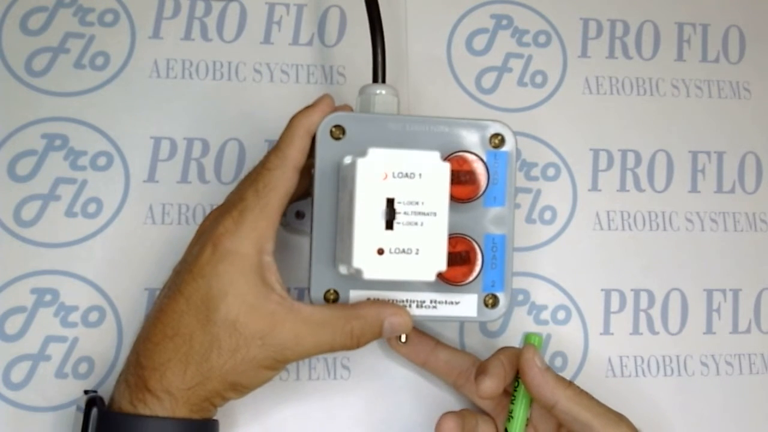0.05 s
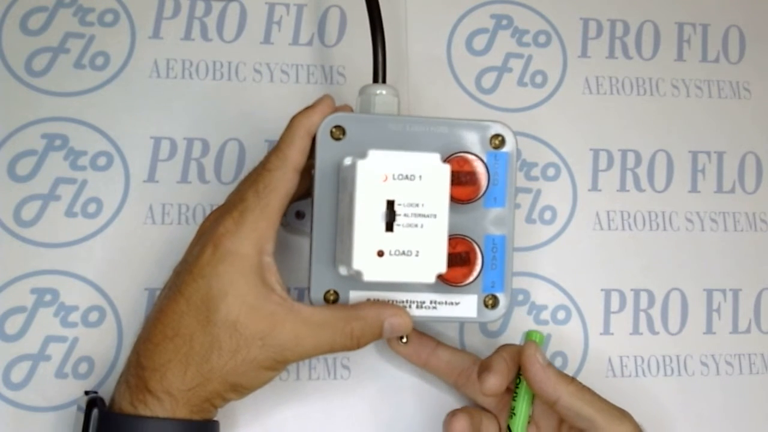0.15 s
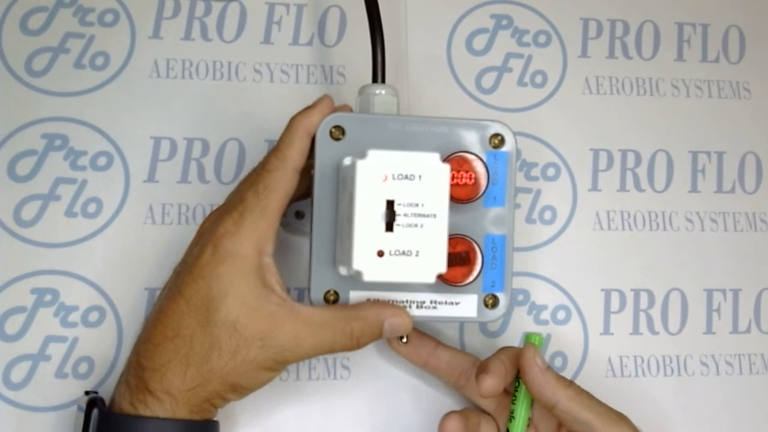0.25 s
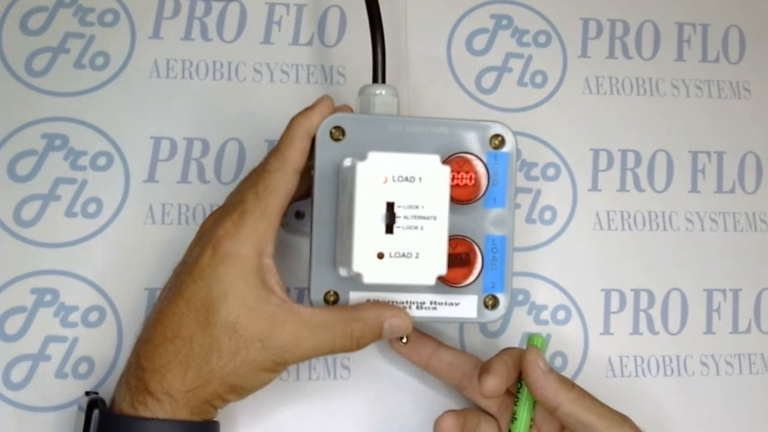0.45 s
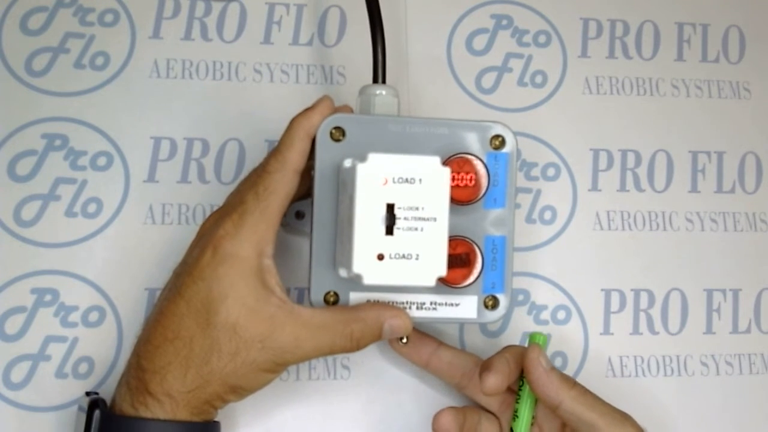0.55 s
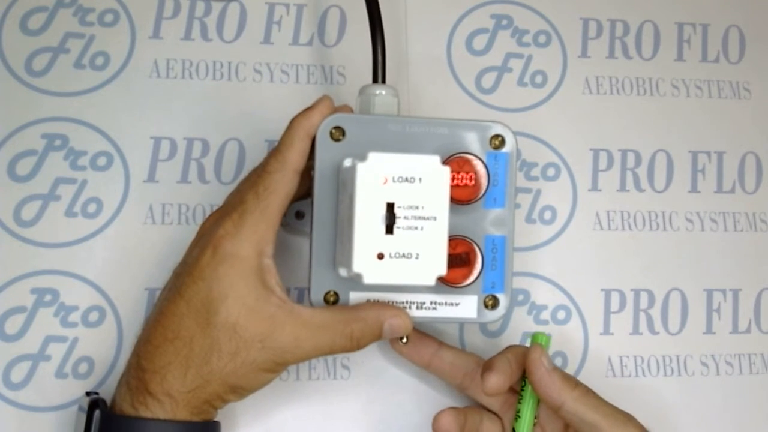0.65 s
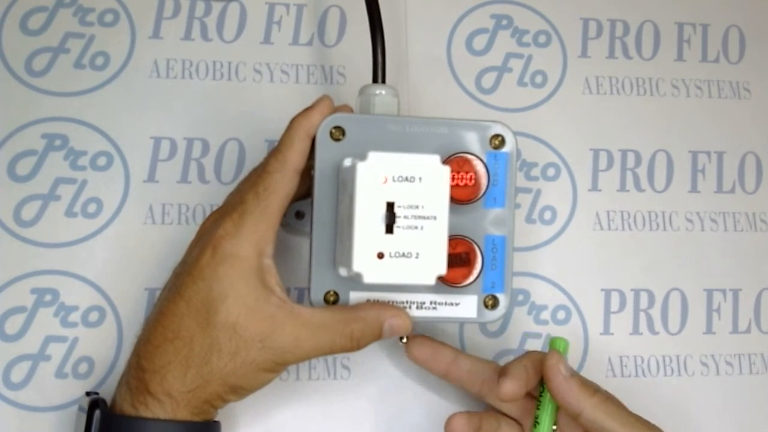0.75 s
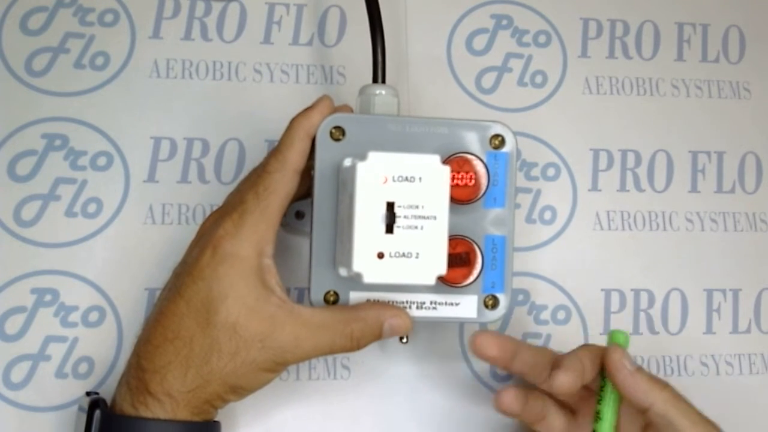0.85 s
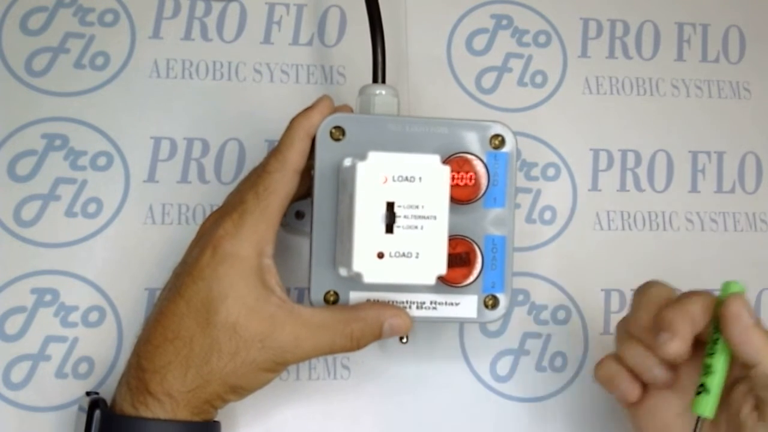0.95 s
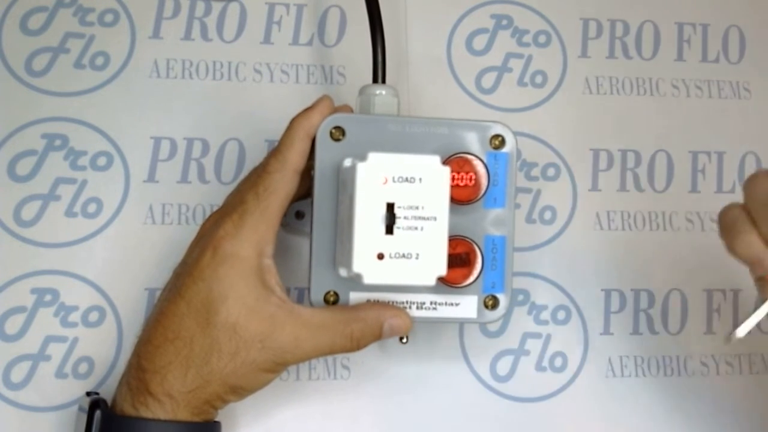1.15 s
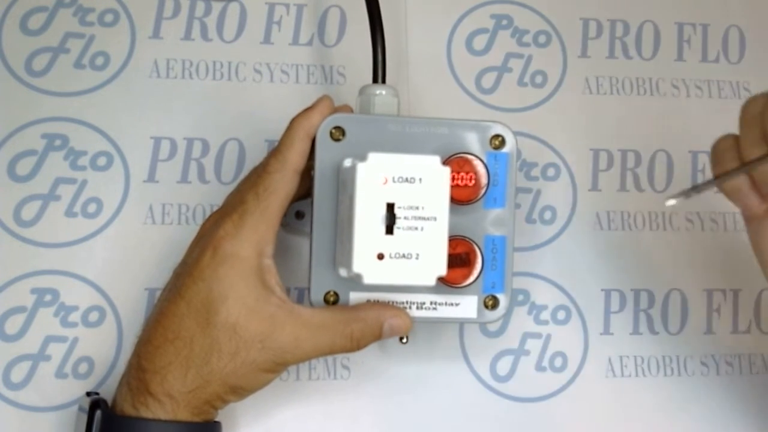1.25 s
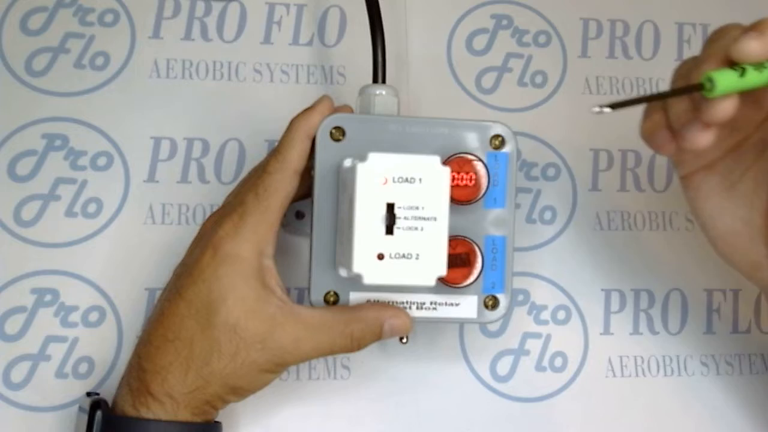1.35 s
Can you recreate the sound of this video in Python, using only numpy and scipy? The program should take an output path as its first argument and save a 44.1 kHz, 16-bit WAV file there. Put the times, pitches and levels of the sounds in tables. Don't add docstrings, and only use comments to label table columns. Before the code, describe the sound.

One hard, crisp toggle switch click with short room echo, then faint tool ticks over quiet low hum

```python
import sys
import numpy as np
from scipy import signal
from scipy.fft import rfft, irfft
from scipy.io import wavfile

SR = 44100
rng = np.random.default_rng(int(sys.argv[2]) if len(sys.argv) > 2 else 0)


def magnitude_from_level(level_db):
    exponent = np.asarray(level_db, float) / 20
    return 10 ** exponent


def unload_wav(signal):
    wavfile.write(
        sys.argv[1],
        SR,
        np.round(np.clip(np.atleast_2d(signal).T, -1, 1) * 32767).astype(np.int16),
    )


N = 61739

# time_s, pitch_hz, level_db, second_partial_db
MOTOR = [(0, 100.7, -57.5, -67.5), (.15, 99.6, -53.5, -63.5), (.22, 99.26, -59, -63),
         (.35, 99.32, -56.5, -68.5), (.52, 98.58, -50.5, -64.5), (.66, 97.1, -61, -60),
         (.82, 94.46, -63, -64.5), (.92, 93.72, -61.5, -67.5), (1.1, 92.82, -64.5, -73.5),
         (1.3, 90.64, -67, -68.5), (1.4, 94.46, -60, -73.5)]
WAVER_DB, WAVER_HZ = 3, 1.2
# time_s, level_db
WHINE = [(0, -90), (.45, -89.5), (0.549, -76), (0.899, -81), (1.4, -91)]
WHINE_HZ = 544
# freq_hz, density_db_per_hz
RUMBLE = [(30, -41), (60, -32), (90, -9.5), (160, 1.5), (240, -6), (330, -15.5), (600, -24.5),
          (1000, -35.5)]
# time_s, level_db
RUMBLE_LEVEL = [(0, -62), (.15, -62), (.5, -59), (.9, -62.5), (1.3, -64.5), (1.4, -63)]
# freq_hz, density_db_per_hz
HISS = [(300, -0.5), (500, -1), (900, -5), (4000, -7), (12000, -14), (15700, -20.5), (16100, -52.5)]
HISS_DB = -70.5
# start_s, length_s, level_db
RUBS = [
    (.096, .023, -61),
    (1.325, .018, -73),
    (1.357, .016, -68),
]
# freq_hz, level_db, t60_s
RUBBED = [(880, 0, .012), (2800, -6, .006), (3600, -5, .007), (5100, 0, .007), (6600, 0, .007),
          (1700, -9, .006)]
# freq_hz, level_db, t60_s, chatter_swell_db
METAL = [(6400, -7, .005, 16), (6780, 1.5, .005, 3), (7250, -8, .003, -12), (8500, -17, .003, 0),
         (10000, -14, .003, -3), (12300, -17, .002, 4), (15400, -12, .002, 0)]
# freq_hz, level_db, t60_s, delay_s
BOX = [(207, -26.5, 0.086, 0.0055), (203, -29, .06, .036), (319.95, -28, .09, 0.0025),
       (314.43, -31, .08, .04), (409.88, -33.5, .04, 0.0035), (618.74, -35.5, .02, .004),
       (1095.6, -21.5, 0.0164, .002), (1647.4, -26, 0.031, .003), (2218.2, -22.5, 0.0068, 0.0013),
       (2800, -14.5, 0.0059, 0.0028), (3300, -17, 0.0076, 0.00185), (4248.7, -11, 0.0067, .004),
       (3838, -14, .006, 0.01299), (5119, -14.5, .005, 0.00041)]
SNAP_S, CHATTER_S, METAL_DB, SNAP_SLIP = .2375, .0032, -.5, .1
# freq_hz, density_db_per_hz
CRACK = [(150, -12), (450, -3.5), (1500, -3.5), (4000, 0), (6700, 4.5), (9000, -5), (12000, -10.5),
         (16000, -22.5)]
CRACK_DB, THROWN_DB, RATTLE_CUT_HZ = -24, 5, 2300
# freq_hz, t60_s
ROOM_T60 = [(200, 0.4), (500, 0.3053), (1000, 0.2962), (3000, 0.2897), (6500, 0.2847), (9000, 0.212),
            (13000, 0.2716), (16000, 0.02)]
# freq_hz, level_db
WALLS = [(200, -2.5), (700, 5.5), (2000, 2), (4000, 1), (6500, -1), (9000, 0), (12000, -8.5), (16000, -15)]
# delay_s, level_db
ECHOES = [(.0045, -12.5), (.0075, -14.5), (0.0119, -15), (0.0151, -7), (.038, -14)]
ROOM_DB, BUILD_S = -22.5, 0.004
RINGS_TO_WALLS_DB, TICKS_TO_WALLS_DB = -13, -14.5
# start_s, peak_db, pitch_hz, t60_s
TICKS = [(.983, -61, 6079, 0.0093), (1.021, -58.5, 1559, 0.00645), (1.021, -61.5, 2630, 0.0088),
         (1.022, -65.5, 3674, 0.0102), (1.102, -52, 6497, 0.0114), (1.102, -55, 10500, 0.0039),
         (1.102, -56.5, 3000, 0.00376), (1.186, -46.5, 6500, 0.00935), (1.186, -47.5, 11160, 0.00528),
         (1.186, -57.5, 4208, 0.014), (1.187, -60.5, 2004, 0.0076), (1.19, -52, 9800, 0.0063),
         (1.188, -50.5, 5980, 0.013), (1.2055, -49, 6600, 0.01398), (1.2055, -50, 10190, 0.0077),
         (1.284, -61, 2800, 0.0039), (1.284, -60.5, 5605, .005), (1.3167, -52, 6850, 0.00839),
         (1.3161, -52, 4791, 0.0046), (1.332, -55, 6500, 0.015), (1.343, -63, 6626, .007),
         (1.349, -57, 6800, 0.0069), (1.3635, -51, 5400, 0.0078), (1.364, -57.5, 856, 0.0079),
         (1.367, -52, 4800, 0.0069), (1.3748, -41, 5450, 0.010552), (1.3741, -46.5, 7100, 0.0058),
         (1.377, -51.5, 1600, 0.007), (1.377, -55.5, 2500, 0.0053)]
TICK_RUB_S, TICK_SPREAD, TICK_SLIP = .0011, .1, .4
LOW_CUT_HZ, TOP_CUT_HZ = 140, 16700


def at_hz(points, hz):
    points_hz, values = np.transpose(points)
    return np.interp(np.log(hz), np.log(points_hz), values)


def in_time(rows):
    s, *columns = np.transpose(rows)
    return [np.interp(np.arange(N) / SR, s, column) for column in columns]


def rms_one(x):
    return x / np.sqrt(np.mean(x ** 2) + 1e-20)


def drift(rate_hz):
    r = np.exp(-2 * np.pi * rate_hz / SR)
    noise = rng.standard_normal(2 * N)
    return rms_one(signal.lfilter([1], [1, -2 * r, r * r], noise)[N:])


def high_pass(x, hz):
    return signal.sosfilt(signal.butter(4, hz, "high", fs=SR, output="sos"), x)


def top_cut(x, hz):
    return signal.sosfilt(signal.cheby2(10, 50, hz, fs=SR, output="sos"), x)


def shaped(x, spectrum):
    size = 2048
    hz = np.arange(size // 2 + 1) * SR / size + 1
    quefrency = irfft(np.log(magnitude_from_level(at_hz(spectrum, hz))))
    quefrency[1:size // 2] *= 2
    quefrency[size // 2 + 1:] = 0
    return signal.fftconvolve(x, irfft(np.exp(rfft(quefrency))))[:N]


def ring(force, hz, t60_s):
    r, w = magnitude_from_level(-60 / (t60_s * SR)), 2 * np.pi * hz / SR
    return signal.lfilter([0, np.sin(w)], [1, -2 * r * np.cos(w), r * r], force + 1e-18)


def burst(start_s, length_s, swell_db):
    u = (np.arange(N) / SR - start_s) / length_s
    edge = np.clip(np.minimum(u, 1 - u) * 8, 0, 1)
    force = edge * magnitude_from_level(swell_db * np.clip(u, 0, 1)) * rng.uniform(.4, 1.6, N)
    return force / force.sum()


def struck(force, hz, t60_s, slip):
    swing = np.cos(2 * np.pi * hz * np.arange(N) / SR + rng.uniform(0, 2 * np.pi))
    drive = swing + slip * 3 * rng.standard_normal(N)
    return ring(2 * force * drive, hz, t60_s)


def motor():
    hz, db, second_db = in_time(MOTOR)
    turn = 2 * np.pi * np.cumsum(hz + WAVER_HZ * drift(15)) / SR
    first = magnitude_from_level(db + WAVER_DB * drift(4.5)) * np.sin(turn)
    second = magnitude_from_level(second_db + WAVER_DB * drift(8.9)) * np.sin(2 * turn + 1)
    whine_level = magnitude_from_level(in_time(WHINE)[0] + 2 * drift(5.3))
    whine = whine_level * np.sin(2 * np.pi * WHINE_HZ * np.arange(N) / SR)
    return np.sqrt(2) * (first + second + whine)


def coloured(spectrum, patchy_db):
    white, hz = rfft(rng.standard_normal(N)), np.arange(N // 2 + 1) * SR / N + 1
    spectrum_amp = magnitude_from_level(at_hz(spectrum, hz))
    out = 0
    for centre_hz in 20 * 2 ** np.arange(0, 10, .5):
        share = np.clip(1 - np.abs(2 * np.log2(hz / centre_hz)), 0, 1)
        band = irfft(white * share * spectrum_amp, N)
        out = out + magnitude_from_level(patchy_db * drift(3)) * band
    return rms_one(out)


def background():
    rumble = magnitude_from_level(in_time(RUMBLE_LEVEL)[0]) * coloured(RUMBLE, patchy_db=-1.5)
    return rumble + magnitude_from_level(HISS_DB) * coloured(HISS, patchy_db=0)


def rubs():
    t = np.arange(N) / SR
    stroke, grain = 0, 0
    for start_s, length_s, db in RUBS:
        stroke = stroke + magnitude_from_level(db) * np.sin(np.pi * np.clip((t - start_s) / length_s, 0, 1)) ** 2
    for hz, db, t60_s in RUBBED:
        resonance = rms_one(ring(rng.standard_normal(N), hz, t60_s))
        grain = grain + magnitude_from_level(db + 3 * drift(82)) * resonance
    return stroke * grain


def switch():
    metal, box = 0, 0
    for hz, db, t60_s, swell_db in METAL:
        force = burst(SNAP_S, CHATTER_S, swell_db)
        metal = metal + magnitude_from_level(db) * struck(force, hz, t60_s, SNAP_SLIP)
    for hz, db, t60_s, delay_s in BOX:
        force = burst(SNAP_S + delay_s, max(.0015, 1 / hz), 0)
        box = box + magnitude_from_level(db) * struck(force, hz, t60_s, SNAP_SLIP)
    return magnitude_from_level(METAL_DB) * metal + box


def crack():
    rattle = burst(SNAP_S, CHATTER_S, 0) * rng.choice([-1, 1], N) * CHATTER_S * SR
    blow = np.zeros(N)
    blow[int((SNAP_S + CHATTER_S / 2) * SR)] = 1
    return magnitude_from_level(CRACK_DB) * high_pass(rattle, RATTLE_CUT_HZ), magnitude_from_level(THROWN_DB) * shaped(blow, CRACK)


def room(near, thrown):
    size = 32768
    t, hz = np.arange(size) / SR, np.arange(size // 2 + 1) * SR / size + 1
    white, tail = rfft(rng.standard_normal(size)), 0
    for centre_hz in 80 * 2 ** np.arange(0, 8.5, .25):
        share = np.clip(1 - np.abs(4 * np.log2(hz / centre_hz)), 0, 1)
        tail = tail + irfft(white * share, size) * magnitude_from_level(-60 * t / at_hz(ROOM_T60, centre_hz))
    tail = magnitude_from_level(ROOM_DB) * tail * (1 - np.exp(-t / BUILD_S))
    delays = sum(magnitude_from_level(db) * np.exp(-2j * np.pi * hz * delay_s) for delay_s, db in ECHOES)
    echoes = irfft(delays, size)[:size // 8]
    returned = signal.fftconvolve(near, echoes)[:N] + signal.fftconvolve(thrown, tail)[:N]
    return shaped(returned, WALLS)


def ticks():
    out = 0
    for start_s, db, hz, t60_s in TICKS:
        for side in (-1, 0, 1):
            force = burst(start_s, TICK_RUB_S, -12)
            mode_hz, mode_t60_s = hz * (1 + side * TICK_SPREAD), t60_s / (1 + abs(side))
            out = out + magnitude_from_level(db - 1.3 * abs(side)) * struck(force, mode_hz, mode_t60_s, TICK_SLIP)
    return out


def scene():
    rings, (rattle, blow), small = switch(), crack(), ticks()
    near = rings + rattle
    far = magnitude_from_level(TICKS_TO_WALLS_DB) * small
    walls = room(near + far, magnitude_from_level(RINGS_TO_WALLS_DB) * rings + blow + far)
    quiet = high_pass(small + rubs() + walls, LOW_CUT_HZ) + background()
    mix = high_pass(near, LOW_CUT_HZ) + top_cut(quiet, TOP_CUT_HZ) + motor()
    return mix[None]


def low_pass(x):
    return signal.sosfilt(signal.butter(12, 16720, fs=SR, output="sos"), x)


def record(dry):
    mix = top_cut(dry, 17000)
    return low_pass(mix)


dry = scene()
out = record(dry)
unload_wav(out)
```